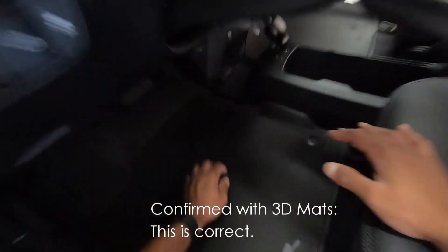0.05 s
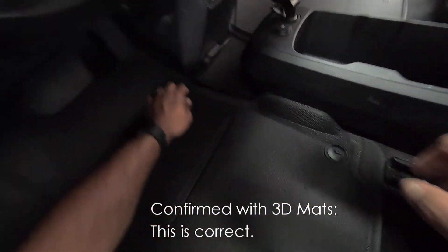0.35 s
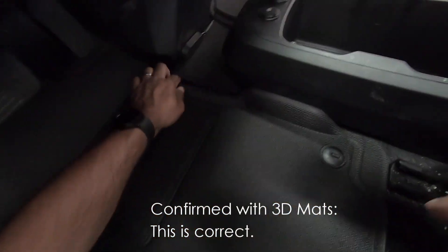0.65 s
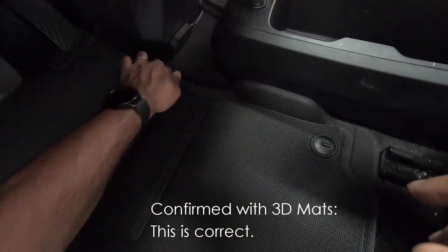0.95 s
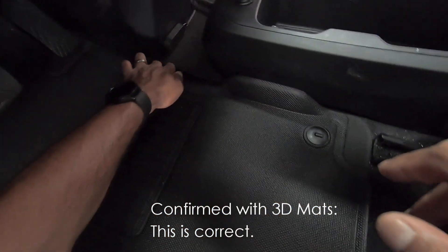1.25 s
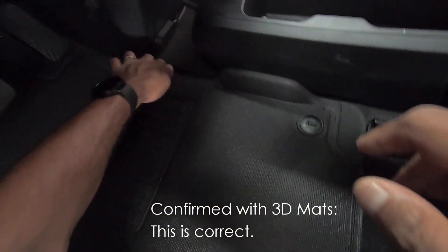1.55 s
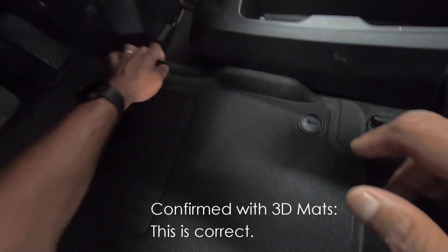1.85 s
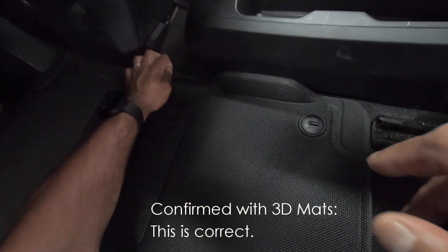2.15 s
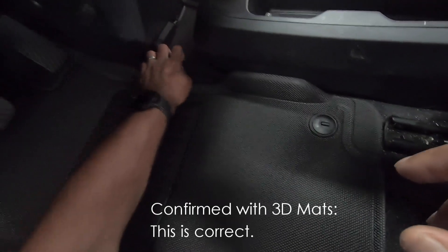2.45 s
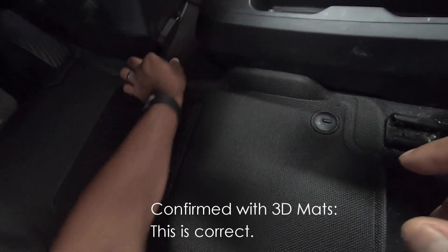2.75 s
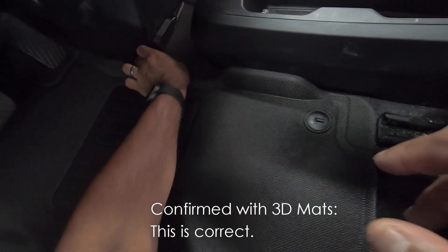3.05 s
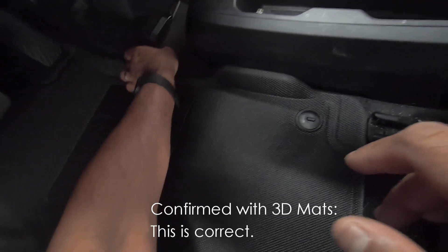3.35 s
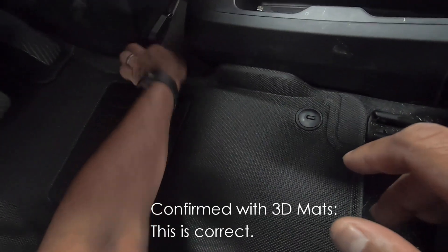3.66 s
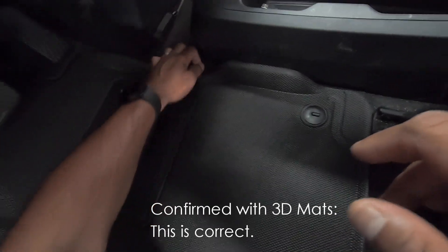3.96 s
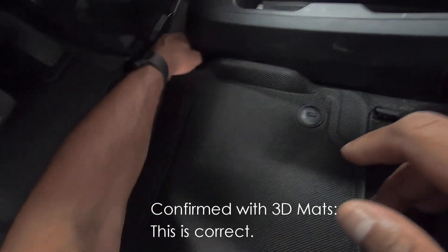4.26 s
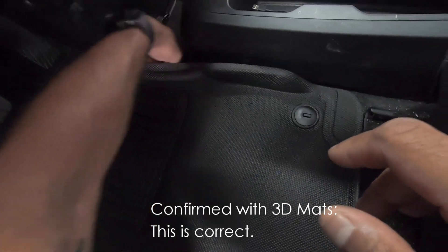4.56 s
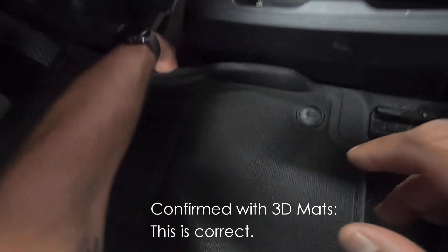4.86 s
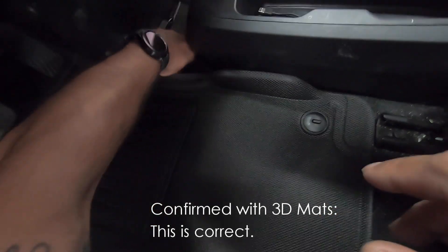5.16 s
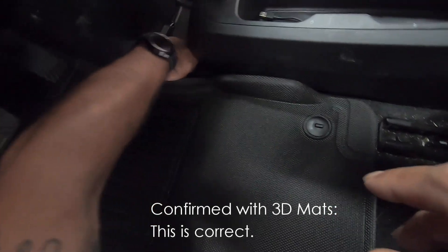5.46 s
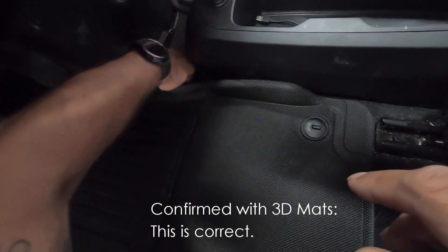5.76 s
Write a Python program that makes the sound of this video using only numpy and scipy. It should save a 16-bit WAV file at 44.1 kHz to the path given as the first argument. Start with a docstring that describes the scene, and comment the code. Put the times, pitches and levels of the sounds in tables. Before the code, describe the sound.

Irregular knocks, soft thumps and rubbing as a molded rubber mat is tucked against car trim, with one microphone bump and a low hum.

```python
"""A moulded rubber liner is pressed and tucked into a car footwell, heard from close by.
Impacts on the trim excite its resonances and those of the floor; stick-slip friction makes it judder,
creak and squeak. An arm brushes along, giving friction noise. The microphone is knocked and scraped
once, which makes the gain duck. A mains hum and a fan drone into the small, heavily damped cabin."""
import sys
import numpy as np
from scipy import signal
from scipy.fft import rfft, irfft
from scipy.io import wavfile
from scipy.ndimage import uniform_filter1d, minimum_filter1d

SR = 44100
rng = np.random.default_rng(int(sys.argv[2]) if len(sys.argv) > 2 else 0)


def unload_audio(sound):
    """Save the sound as a 16-bit wav file, at the path given as the first command line argument."""
    columns = np.transpose(np.atleast_2d(sound))
    # keep every value between -1 and 1, then stretch to whole-number steps
    steps = np.round(np.clip(columns, -1, 1) * 32767)
    wavfile.write(sys.argv[1], SR, steps.astype(np.int16))


N = 256766
TIME = np.arange(N) / SR

# Noise spectra. Each row: frequency in Hz, relative spectral density in dB.
STILL_AIR_SPECTRUM = [(530, -29), (900, 0.5), (1550, -3), (1740, -5), (2390, -4.5), (2660, -7), (4160, -9),
                      (6060, -21), (7940, -14.5), (9040, -30), (15000, -50)]   # the hiss that remains when the hand rests
AIR_RUMBLE_SPECTRUM = [(15, 12.5), (28, -7), (40, 2.5), (55, 7), (75, -1.5), (110, -4.5), (160, -13),
                       (220, -15), (300, -17), (420, -28), (640, -21.5), (1000, -38), (2000, -77.5)]   # air rumbling under the hum
SCRAPE_SPECTRUM = [(450, -11), (600, -2), (1000, -16), (1480, 1), (2200, -15.5), (2550, -2.5), (2900, -9.5),
                   (3550, -7), (4300, -15.5), (6200, -15.5), (7600, -19.5), (9000, -21.5), (11500, -42),
                   (15500, -50.5)]   # the scraped microphone housing
CLOTH_SPECTRUM = [(400, -1), (520, 2.5), (700, -5), (1000, 0.5), (1300, 2.5), (1600, -4), (2300, -8),
                  (4500, -14), (5800, -12), (7800, -13.5), (9000, -18), (11000, -33)]   # cloth sweeping past
RUSTLE_SPECTRUM = [(700, 15), (1000, 8.5), (1300, 6), (1800, 1), (2200, 4.5), (3400, 3.5), (4400, 1.5),
                   (5500, -17), (8000, -27), (11000, -25.5), (15500, -29)]   # the sliding arm, middle range
HISS_SPECTRUM = [(3500, -35), (5000, -10.5), (6200, -10.5), (7700, -5.5), (8800, -20), (10000, -17.5),
                 (11500, -33.5), (15500, -42)]   # the sliding arm, treble
SWIPE_SPECTRUM = [(250, -1.5), (420, 0.5), (700, 4), (1000, -0.5), (1300, 2), (2000, -3.5), (3400, -2),
                  (4300, -5), (5500, -11.5), (7500, -5.5), (8600, -18), (9600, -13.5), (11000, -24.5),
                  (15500, -26.5)]   # skin on textured plastic
# The drone swells as the microphone leans into the footwell. Each row: time in seconds, hum level in dB.
DRONE_LEVELS = [(0.0, -42), (1.45, -37.5), (2.5, -33.5), (3.15, -36.5), (3.7, -39), (5.82, -42.5)]
# Modes of the microphone housing. Each row: frequency in Hz, relative level in dB, t60 in seconds.
HOUSING_MODES = [(1520, 5, .008), (2450, -2, .005), (4500, -12, .003), (7700, -16, .003)]
# Modes of liner and footwell. Each row: frequency in Hz, bandwidth in Hz, gain in dB.
LINER_MODES = [(125, 50, 0.5), (235, 119, 7), (335, 127, 6), (536.7, 70.6, 3.5), (747, 43, -7.5),
               (1171, 180, -7.5), (1317, 240, -7), (1485, 246, -10.5), (2033, 250, -17.5), (2412, 110, -15),
               (2890, 580, -20), (3970, 560, -21), (4630, 940, -23.5), (6260, 1200, -27.5),
               (7330, 1100, -25), (9900, 1500, -51.5)]
# The hand pushes along the edge. Each row: start and end in seconds, rustle, creak and hiss levels in dB.
HAND_PUSHES = [(-0.1, 0.404, -57.5, -60, -56), (0.974, 1.626, -58.5, -58, -61.5),
               (1.512, 2.168, -52.5, -50, -63.5), (2.24, 2.626, -53, -48.5, -68),
               (2.64, 3.04, -58, -55, -80), (3.58, 3.92, -58, -55, -60), (3.932, 4.189, -54.5, -45.5, -57),
               (4.39, 5.178, -54, -46.5, -56.5), (5.2, 5.76, -64.5, -58.5, -63)]
# Skin swipes over plastic. Each row: middle and half-length in seconds, level in dB,
# tilt in dB per octave (a faster swipe is brighter).
SKIN_SWIPES = [(0.494, 0.0033, -32, -4.5), (0.868, 0.0078, -42, -2.5), (1.083, 0.011, -40, -2.5),
               (1.56, 0.048, -49.5, -3), (1.654, 0.0092, -29, -5), (2.361, 0.017, -37.5, -4),
               (3.648, 0.018, -41.5, -2.5), (4.043, 0.0065, -32.5, 2.5), (5.142, 0.024, -43, -2.5),
               (5.694, 0.049, -41.5, 0)]
# The liner seats against the floor. Each row: time in seconds, level in dB, pitch in Hz, t60 in seconds.
FLOOR_THUDS = [(0.637, -20.5, 83.5, .12), (1.593, -18.5, 165, 0.1), (2.137, -24, 125, .07),
               (2.466, -17, 129, .066), (2.889, -23.5, 115, 0.11), (3.933, -15.5, 115, 0.14),
               (4.088, -13.5, 116, 0.045), (5.557, -32, 194, 0.047)]
# Rubber judders over carpet. Each row: start and end in seconds, level in dB, panel pitch in Hz.
CARPET_SCUFFS = [(0.849, 0.876, -31.5, 565), (1.559, 1.63, -37.5, 610), (1.75, 1.785, -33, 720),
                 (1.784, 1.814, -25.5, 667), (1.961, 2.113, -44, 670), (2.376, 2.42, -29, 505),
                 (2.444, 2.47, -39, 640), (2.511, 2.539, -33, 643), (2.846, 2.909, -42, 540),
                 (4.013, 4.051, -31, 700), (4.072, 4.112, -36.5, 333), (4.376, 4.409, -36, 605),
                 (4.963, 4.994, -43, 674), (5.302, 5.341, -42.5, 770)]
# The liner strikes trim or floor. Each row: time in seconds, knock level in dB, panel pitch in Hz,
# treble tilt in dB per octave (near 0 for a hard edge).
LINER_TAPS = [(0.301, -29, 810, -6.5), (0.628, -27.5, 800, -7.5), (0.846, -30, 660, -7),
              (0.859, -26, 592, -10), (1.649, -25, 665, -1.5), (1.761, -23, 760, -7.5),
              (1.792, -22, 664, -6.5), (1.981, -34, 653, -13.5), (2.122, -33.5, 810, -5),
              (2.225, -17, 563, -4.5), (2.359, -29.5, 490, -3.5), (2.429, -23, 528, -8),
              (2.455, -27.5, 735, -6), (2.474, -21, 673, -8.5), (2.484, -27, 557, -6.5),
              (2.502, -28.5, 542, -6), (2.577, -37, 550, -5), (2.608, -38.5, 530, -5.5),
              (2.621, -36, 522, -6.5), (2.869, -24.5, 515, -9), (2.894, -34, 700, -4.5),
              (2.96, -27, 817, -2.5), (3.654, -23, 690, -0.5), (3.803, -28, 694, -2.5),
              (3.928, -32, 740, -1), (3.986, -31, 667, -2), (3.995, -29.5, 507, -2),
              (4.022, -24.5, 516, -4), (4.037, -24.5, 710, -1), (4.042, -22.5, 695, -7.5),
              (4.062, -20.5, 598, -2), (4.086, -41.5, 640, 3), (4.31, -41, 705, -1.5),
              (4.381, -37, 740, -3), (4.69, -29, 581, -4), (4.926, -42, 537, -1), (5.065, -36, 500, -5.5),
              (5.393, -47, 589, 0), (5.555, -46, 770, 0.5)]


def from_db(db):
    """Decibels to amplitude ratio."""
    return 10 ** (np.asarray(db) / 20)


def unit_rms(x):
    """Normalisation to unit power."""
    return x / np.sqrt(np.mean(x ** 2) + 1e-20)


def at_peak(x, db):
    """Normalisation of the loudest 5 ms to a given RMS level."""
    return from_db(db) * x / np.sqrt(uniform_filter1d(x * x, size=220).max())


def add(out, start_s, sound):
    """Superposition of a sound from a given time on."""
    at = int(start_s * SR)
    out[..., at:at + sound.shape[-1]] += sound[..., :N - at]


def band(x, low_hz, high_hz, order=2):
    """Causal Butterworth band-pass."""
    sos = signal.butter(order, [low_hz, min(high_hz, .45 * SR)], "band", fs=SR, output="sos")
    return signal.sosfilt(sos, x)


def resonate(x, hz, width_hz):
    """A damped resonator with unit gain at its peak."""
    r = np.exp(-np.pi * width_hz / SR)
    feedback = [1, -2 * r * np.cos(2 * np.pi * hz / SR), r * r]
    return signal.lfilter(np.array([1, 0, -1]) * (1 - r * r) / 2, feedback, x + 1e-18)


def colour(x, spectrum):
    """Spectral shaping to unit power, falling 12 dB per octave beyond the table's ends."""
    hz, db = np.transpose(spectrum)
    bins = np.maximum(np.fft.rfftfreq(N, 1 / SR), 1)
    gain = from_db(np.interp(np.log(bins), np.log(hz), db))
    skirts = np.minimum(1, np.minimum(bins / hz[0], hz[-1] / bins)) ** 2
    return unit_rms(irfft(rfft(x) * gain * skirts, N))


def drift(per_s):
    """Random modulation: straight lines between Gaussian values."""
    knots = rng.standard_normal(4000)
    return np.interp(TIME * per_s, np.arange(len(knots)), knots)


def grains(per_s, spread_db):
    """Shot noise: tiny slips of random time, sign and size."""
    impulses = (rng.random(N) < per_s / SR) * rng.choice([-1, 1], N)
    return impulses * from_db(spread_db * np.minimum(rng.exponential(1, N), 4))


def stereo_noise(side_db):
    """Partly coherent white noise: the weaker the side signal, the more alike the two ears."""
    mid, side = rng.standard_normal((2, N))
    return mid + from_db(side_db) * side * [[1], [-1]]


def swell(start, end, attack_s, release_s):
    """A trapezoidal envelope: it rises from the start, holds until the end, then fades."""
    return np.clip((TIME - start) / attack_s, 0, 1) * np.clip(1 - (TIME - end) / release_s, 0, 1)


def still_air(db=-55):
    """Stationary noise: a faint, even hiss under everything."""
    return from_db(db) * colour(stereo_noise(side_db=0), STILL_AIR_SPECTRUM)


def drone(hum_hz=119.5, fan_hz=52.9, duct_hz=623.4, sway_db=3):
    """Tones in noise: mains hum, the narrow-band fan throb and duct resonance, and rumbling air."""
    level_db = np.interp(TIME, *np.transpose(DRONE_LEVELS))
    hum = unit_rms(np.sin(2 * np.pi * np.cumsum(hum_hz + .29 * drift(2.8)) / SR))
    duct = unit_rms(resonate(resonate(stereo_noise(side_db=-7), duct_hz, 32), duct_hz, 32))
    fan = unit_rms(resonate(resonate(stereo_noise(side_db=-24.5), fan_hz, 9), fan_hz, 9))
    air = colour(stereo_noise(side_db=-22), AIR_RUMBLE_SPECTRUM) * from_db(sway_db * drift(10))
    return from_db(level_db) * (hum + from_db(-19) * duct + from_db(-9.5) * fan + from_db(1.5) * air)


def cabin(x, near_db=-15, near_t60=.1, far_db=-12, far_t60=.14):
    """Reflection and absorption: near walls answer alike at both ears; seats soon damp wider echoes."""
    t = np.arange(SR // 5) / SR
    near = rng.standard_normal(len(t)) * from_db(-60 * t / near_t60)
    far = rng.standard_normal((2, len(t))) * from_db(-60 * t / far_t60)
    echoes = from_db(near_db) * near / np.linalg.norm(near)
    echoes = echoes + from_db(far_db) * far / np.linalg.norm(far[0])
    return x + signal.fftconvolve(x, band(echoes, 800, 14000, order=1), axes=1)[:, :N]


def microphone_knock(start_s=.5104, port_lag_s=.00009, crack_t60=.0059, thump_hz=105, thump_t60=.036):
    """Structure-borne sound: a knock rings the housing, reaches each port in turn and thumps the left."""
    out, t = np.zeros((2, N)), np.arange(SR // 20) / SR
    knock = sum((-1) ** k * from_db(1 + db - 60 * t / t60) * np.sin(2 * np.pi * hz * t)
                for k, (hz, db, t60) in enumerate(HOUSING_MODES))
    burst = rng.standard_normal(len(t)) * from_db(-60 * t / crack_t60)
    crack = at_peak(band(burst, 1900, 7300, order=3), db=-17)
    thump = from_db(-3.5 - 60 * t / thump_t60) * np.sin(2 * np.pi * thump_hz * t)
    add(out[0], start_s, knock + crack)
    add(out[1], start_s + port_lag_s, crack - knock)   # rocking pushes one port and pulls the other
    add(out[0], start_s + .0023, thump)
    return out


def microphone_drag(start_s=.513, end_s=.5816, db=-17, sag_db_per_s=100, rumble_t60=.47):
    """Friction on the housing: a short scrape swells, sags and stops while a rumble dies away."""
    elapsed = np.maximum(TIME - start_s, 0)
    friction = stereo_noise(side_db=3) * from_db(2 * drift(400))
    scrape = colour(friction, SCRAPE_SPECTRUM) * from_db([[1.5], [-1.5]])
    rumble = unit_rms(band(stereo_noise(side_db=-1), 18, 200)) * from_db([[-2], [2]])
    envelope = swell(start_s, end_s, attack_s=.018, release_s=.017)
    scrape_gain = from_db(db - sag_db_per_s * elapsed) * envelope
    rumble_gain = (elapsed > 0) * from_db(db - 60 * elapsed / rumble_t60)
    return scrape_gain * scrape + rumble_gain * rumble


def cloth_brush(middle_s=.2, half_s=.31, db=-45, slow_hz=1260, fast_hz=1780, ring_width_hz=520):
    """Friction of a periodic weave: passing cloth rings faintly, louder and higher with speed."""
    speed = np.maximum(1 - ((TIME - middle_s) / half_s) ** 2, 0)
    phase = 2 * np.pi * np.cumsum(slow_hz + (fast_hz - slow_hz) * speed ** 2) / SR
    ring = unit_rms(drift(ring_width_hz) * np.cos(phase) + drift(ring_width_hz) * np.sin(phase))
    cloth = colour(stereo_noise(side_db=1.5), CLOTH_SPECTRUM) * from_db([[-3], [1]])
    return from_db(db) * speed ** .91 * (from_db(-8) * ring + cloth)


def push_gains():
    """Amplitude envelopes of rustle, creak and hiss; every push builds and lets go in the same way."""
    return sum(from_db(levels_db)[:, None] * swell(start, end, attack_s=.11, release_s=.16)
               for start, end, *levels_db in HAND_PUSHES)


def sliding_arm():
    """Roughness noise: the arm's tiny slips over trim and rubber merge into rustle and hiss."""
    rustle_gain, _, hiss_gain = push_gains()
    grit = unit_rms(grains(2500, spread_db=3))
    pressure = from_db(2.8 * drift(40))
    rustle = colour((stereo_noise(side_db=-6.5) + from_db(-5.5) * grit) * pressure, RUSTLE_SPECTRUM)
    hiss = colour((stereo_noise(side_db=6.5) + from_db(-6) * grit) * pressure, HISS_SPECTRUM)
    return rustle_gain * rustle + hiss_gain * hiss


def skin_swipes():
    """Sliding friction of skin on textured plastic: each swipe is noise under a Gaussian envelope."""
    out = np.zeros((2, N))
    friction = stereo_noise(side_db=-1) + from_db(-3) * unit_rms(grains(3000, spread_db=3.5))
    for middle_s, half_s, db, tilt_db in SKIN_SWIPES:
        spectrum = [(hz, level + tilt_db * np.log2(hz / 1000)) for hz, level in SWIPE_SPECTRUM]
        envelope = np.exp(-.5 * ((TIME - middle_s) / half_s) ** 2)
        out += from_db(db) * envelope * colour(friction, spectrum)
    return out


def liner_modes(force, vary_db):
    """Modal superposition: each contact point excites the resonances a little differently."""
    return sum((-1) ** k * from_db(db + vary_db * rng.normal()) * resonate(force, hz, width_hz)
               for k, (hz, width_hz, db) in enumerate(LINER_MODES))


def liner(force, panel_hz):
    """Forced response of the modes and of the free panel, whose pitch depends on the hand's grip."""
    return liner_modes(force, vary_db=2) + from_db(4) * resonate(force, panel_hz, width_hz=76)


def crackle(db_re_rustle=-6):
    """Sparse stick-slip: the sliding rubber catches and lets go with tiny ticks."""
    rustle_gain, _, _ = push_gains()
    ticks = band(liner_modes(grains(45, spread_db=3), vary_db=1), 800, 9000, order=1)
    return rustle_gain * from_db(db_re_rustle) * unit_rms(ticks)


def creaks():
    """Dense stick-slip: the rubber creeps faintly under the pushing fingers."""
    _, creak_gain, _ = push_gains()
    force = grains(1500, spread_db=2.5) * from_db(4.9 * drift(25))
    return creak_gain * unit_rms(band(liner(force, panel_hz=698), 230, 1000, order=1))


def squeak(start_s=4.83, length_s=.03, db=-33, start_hz=830, sag_hz_per_s=7000, jitter=.22):
    """Relaxation oscillation: fast slips on the trim fuse into a rough note, falling as grip lets go."""
    out, t = np.zeros(N), np.arange(int(length_s * SR)) / SR
    slip_hz = (start_hz - sag_hz_per_s * t) * (1 + jitter * drift(900)[:len(t)])
    slips = np.diff(np.floor(np.cumsum(slip_hz) / SR), prepend=0)   # one impulse a cycle
    force = slips * np.sin(np.pi * t / length_s)
    add(out, start_s, at_peak(band(liner(force, panel_hz=678), 920, 5700, order=1), db))
    return out


def scuffs(slips_per_s=310, jitter=.23, uneven_db=3.5):
    """Stick-slip on carpet: a short, uneven pulse train makes the liner judder."""
    out = np.zeros(N)
    for start, end, db, panel_hz in CARPET_SCUFFS:
        length = max(int((end - start) * SR), SR // 100)
        gap_scatter, size_scatter = rng.standard_normal((2, 80))
        slip_at = (np.cumsum(np.exp(jitter * gap_scatter)) * SR / slips_per_s).astype(int)
        inside = slip_at < length
        arch = np.sqrt(np.sin(np.pi * slip_at[inside] / length))
        force = np.zeros(length + SR // 10)
        force[slip_at[inside]] = from_db(uneven_db * size_scatter[inside]) * arch
        judder = band(liner(force, panel_hz), 300, 2400, order=1)
        add(out, start, from_db(db) * judder * np.sqrt(length / np.sum(judder ** 2)))
    return out


def floor_thuds(rise_s=.00056):
    """Damped free vibration: the floor pan gives a few low swings as the liner seats."""
    out, t = np.zeros(N), np.arange(SR // 4) / SR
    for start_s, db, hz, t60 in FLOOR_THUDS:
        envelope = from_db(db - 60 * t / t60) * (1 - np.exp(-t / rise_s))
        add(out, start_s, envelope * np.sin(2 * np.pi * hz * t))
    return out


def contact(t, crush_db, t60):
    """Impact force: the edge grazes, lands as an impulse at t = 0, then crunches away."""
    envelope_db = np.where(t < 0, -11 + 20 * t / .014, -60 * t / t60)
    return (t == 0) + from_db(crush_db + envelope_db) * rng.standard_normal(len(t))


def taps(lead_s=.01, snap_octaves=2.06, click_octaves=3.7):
    """Impact excitation: the push's weight thumps, the panel knocks, a harder edge snaps and clicks."""
    out, t = np.zeros(N), np.arange(-int(lead_s * SR), SR // 5) / SR
    for time_s, db, panel_hz, tilt_db in LINER_TAPS:
        blow = liner(contact(t, crush_db=-24, t60=.041), panel_hz)
        grit = liner_modes(contact(t, crush_db=-24.5, t60=.04), vary_db=3.5)
        thump = at_peak(band(blow, 60, 313), db - 1.5)
        knock = at_peak(band(blow, 398, 1036), db)
        snap = at_peak(band(blow, 1410, 4760, order=3), db - 1.5 + tilt_db * snap_octaves)
        click = at_peak(band(grit, 3130, 10700, order=3), db - 8.5 + tilt_db * click_octaves)
        add(out, time_s - lead_s, thump + knock + snap + click)
    return out


def gain_control(x, limit_db=-7, max_cut_db=6, attack_s=.033, hold_s=.61, release_db_per_s=26):
    """Compression: a peak over the limit turns the gain down; it holds, then recovers."""
    peak_db = 20 * np.log10(np.abs(x).max(axis=0) + 1e-9)
    over_db = np.clip(peak_db - limit_db, 0, max_cut_db)
    hold = int(hold_s * SR)
    held_db = -minimum_filter1d(-over_db, size=hold, origin=(hold - 1) // 2, mode="constant")
    recovery_db = release_db_per_s * TIME
    cut_db = np.maximum.accumulate(held_db + recovery_db) - recovery_db
    pole = np.exp(-1 / (attack_s * SR))
    return x * from_db(-signal.lfilter([1 - pole], [1, -pole], cut_db))


def scene():
    """Superposition: liner and arm in the cabin, plus thuds, cloth, microphone noise and background."""
    handling = taps() + scuffs() + creaks() + squeak() + crackle() + sliding_arm() + skin_swipes()
    foreground = cabin(handling) + floor_thuds() + cloth_brush() + microphone_knock() + microphone_drag()
    return foreground + drone() + still_air()


def record(dry):
    """Mid-side scaling narrows and reopens the image; gain control, saturation and a low-pass follow."""
    closes_s, close_db_per_s, opens_s, opening_length_s = .56, 39, 3.08, 1.02
    side_db, ceiling, cutoff_hz = -2.1, .92, 15750
    closing = from_db(-close_db_per_s * np.maximum(TIME - closes_s, 0))
    opening = np.clip((TIME - opens_s) / opening_length_s, .01, 1)
    width = from_db(side_db) * np.maximum(closing, opening)
    mid = dry.mean(axis=0)
    ducked = gain_control(mid + width * (dry - mid))
    saturated = ceiling * np.tanh(ducked / ceiling)
    return signal.sosfilt(signal.ellip(14, .1, 90, cutoff_hz, fs=SR, output="sos"), saturated)


dry = scene()
out = record(dry)
unload_audio(out)
```